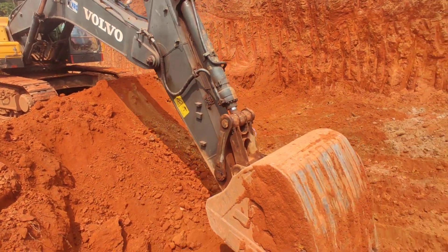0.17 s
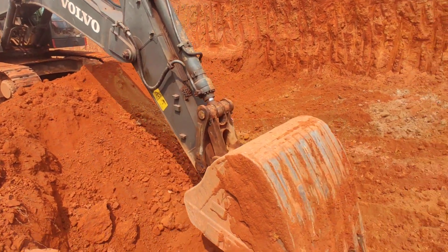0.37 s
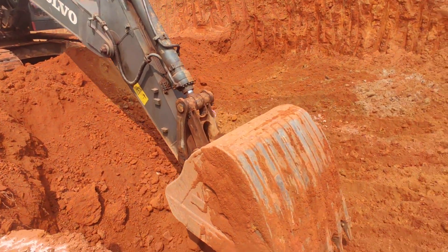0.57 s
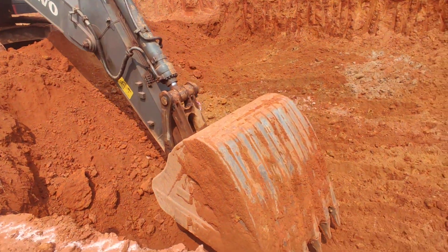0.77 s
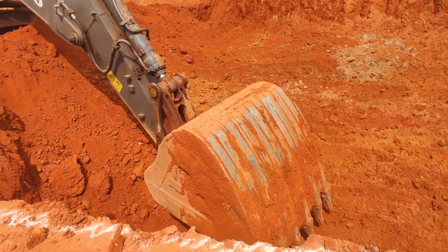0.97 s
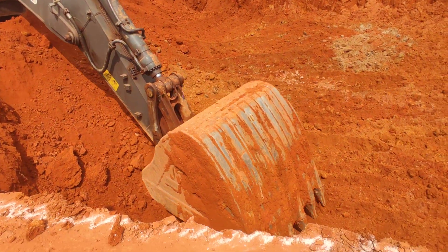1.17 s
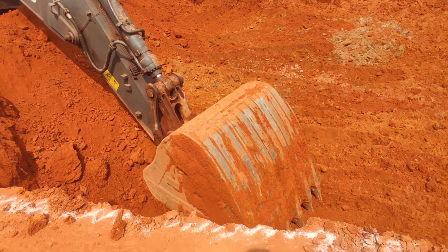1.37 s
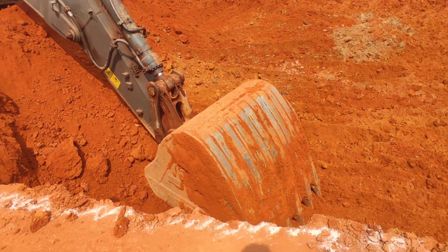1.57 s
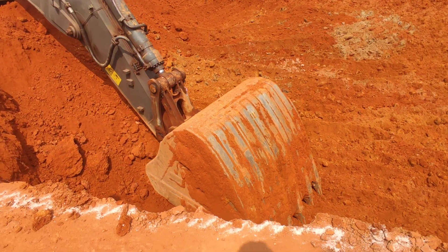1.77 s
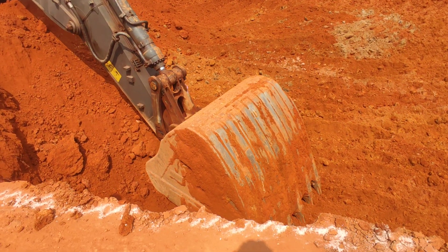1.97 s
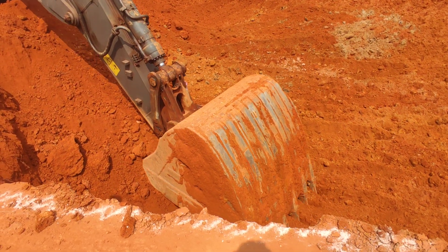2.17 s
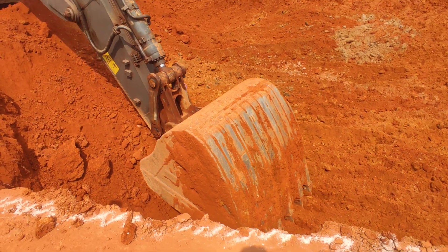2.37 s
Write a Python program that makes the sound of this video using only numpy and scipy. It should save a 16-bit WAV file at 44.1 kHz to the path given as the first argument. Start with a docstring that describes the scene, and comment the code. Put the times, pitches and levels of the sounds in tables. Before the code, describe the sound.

Close stereo phone pickup of an excavator outdoors: rough engine thrum, fan roar and wavering pump hum, with bucket clunks, one creaky steel squeal midway, a crisp knock and a final heavy clanking thud.

```python
"""A diesel excavator works in an earthen pit, weighted to the left over most of the range below the high treble.
Uneven firings thrum in exhaust resonances, the hydraulic pump hums as sines locked to the engine speed, and
fan and oil lines roar and hiss as noise that pulses with the firings. A dry pin squeals once as noise held in
resonances over a low creak; the bucket thuds and its linkage clanks as decaying modes, with echo from the pit walls."""
import sys
import numpy as np
from scipy import signal
from scipy.fft import rfft, irfft, next_fast_len
from scipy.io import wavfile
from scipy.ndimage import uniform_filter1d

SR = 44100
rng = np.random.default_rng(int(sys.argv[2]) if len(sys.argv) > 2 else 0)


def unload_audio(sound):
    """Save the sound as a 16-bit wav file, at the path given as the first command line argument."""
    columns = np.transpose(np.atleast_2d(sound))
    # keep every value between -1 and 1, then stretch to whole-number steps
    steps = np.round(np.clip(columns, -1, 1) * 32767)
    wavfile.write(sys.argv[1], SR, steps.astype(np.int16))


N = 111573
T = np.arange(N) / SR


def undb(db):
    """dB to gain."""
    return 10 ** (np.asarray(db) / 20)


def unit(x):
    """Scale to rms 1."""
    return x / np.sqrt(np.mean(x ** 2))


def curve(table, col):
    """One column of a table, drawn as straight lines through time."""
    table = np.array(table)
    return np.interp(T, table[:, 0], table[:, col])


def at_hz(spec, hz):
    """A spectrum in dB read on a log frequency axis."""
    spec = np.array(spec)
    return np.interp(np.log(hz + 1), np.log(spec[:, 0] + 1), spec[:, 1])


def band(x, hz, width):
    """Resonance with gain 1 at its centre."""
    return signal.lfilter(*signal.iirpeak(hz, hz / width, SR), x)


def double_band(x, hz, width):
    """The same resonance twice in a row, for steeper skirts."""
    return band(band(x, hz, width), hz, width)


def walk(rate):
    """Smooth random wander: random levels held 1 / rate seconds, averaged twice, with gain to make up the loss."""
    k = int(SR / rate)
    steps = np.repeat(rng.standard_normal(N // k + 1), k)
    return 1.238 * uniform_filter1d(uniform_filter1d(steps, k), k)[:N]


def add(out, s, db, x):
    """Mix a sound in at time s with its peak at db."""
    i = int(s * SR)
    out[i:i + len(x)] += (undb(db) * x / abs(x).max())[:N - i]


# Engine drive. Each row: time in seconds, firing rate in Hz, pump hum level in dB, roar level in dB,
# hiss level in dB.
ENGINE_DRIVE = [(0, 87.28, -32.5, -25, -35), (.16, 87.6, -23.5, -26.5, -33),
                (.29, 88.18, -33.5, -27, -35.5), (.45, 86.74, -26, -24.5, -39),
                (.52, 87.76, -27.5, -28, -37), (.95, 89.67, -26, -29, -38.5),
                (1.08, 89.46, -40, -25.5, -38), (1.4, 91.41, -36.5, -28.5, -40.5),
                (1.75, 91.62, -47, -33, -44), (1.95, 91.74, -36, -29.5, -43),
                (2.12, 87.5, -31, -27.5, -41.5), (2.3, 87.5, -31.5, -26, -42),
                (2.53, 89.83, -37, -21, -40.5)]
CYCLE_JITTER = 0.266  # firing cycles


def engine_cycle():
    """Firing phase in cycles, steady and with the timing jitter of combustion."""
    phase = np.cumsum(curve(ENGINE_DRIVE, 1)) / SR
    return phase, phase + CYCLE_JITTER * walk(40)


# Exhaust resonances. Each row: centre in Hz, width of one filter pass in Hz, relative level in dB.
EXHAUST_RESONANCES = [(49.3, 4.7, -8), (92.1, 17, -5.5), (168.3, 39.6, 1), (345.7, 105, -6)]
EXHAUST_DB = -9  # against the roar level
FIRING_SCATTER_DB, ODD_FIRING_DB = 4.5, -4.5


def exhaust(loose):
    """Each firing is one pressure pulse of uneven strength, every second one weaker, that rings the exhaust."""
    at = np.flatnonzero(np.diff(np.floor(loose)) > 0)
    scatter = FIRING_SCATTER_DB * rng.standard_normal(len(at))
    pulses = np.zeros(N)
    pulses[at] = undb(scatter + ODD_FIRING_DB * (np.arange(len(at)) % 2))
    thrum = sum(undb(db) * unit(double_band(pulses, hz, width)) for hz, width, db in EXHAUST_RESONANCES)
    return undb(curve(ENGINE_DRIVE, 3) + EXHAUST_DB) * unit(thrum)


UPPER_HUM_DB, HUM_WAVER_DB, UPPER_WAVER_DB = -44, 1, 4.5
HUM_DRIFT = 0.021  # firing cycles


def pump_hum(phase):
    """Pump tones at 3 and 5 times the firing rate, wavering in level and drifting slightly in phase."""
    hum = np.zeros(N)
    for order, db, waver_db in ((3, curve(ENGINE_DRIVE, 2), HUM_WAVER_DB), (5, UPPER_HUM_DB, UPPER_WAVER_DB)):
        level = np.sqrt(2) * undb(db + waver_db * walk(11.86))  # sqrt(2): levels are rms
        hum += level * np.sin(2 * np.pi * order * (phase + HUM_DRIFT * walk(10)))
    return hum


SWELL_DB, FLICKER_DB = .6, 2  # reached from 400 Hz up, smaller below


def shimmer(spec):
    """Third-octave noise bands that swell together and flicker alone; rows: direct, scattered left, scattered right."""
    f = np.fft.rfftfreq(N, 1 / SR)
    low, high = spec[0][0], spec[-1][0]
    swell = walk(2.83)
    colored = rfft(rng.standard_normal((3, N))) * undb(at_hz(spec, f)) * (f > low) * (f < high)
    place = 3 * np.log2(f + 1)  # third-octave number of each frequency
    out = 0
    for k in np.arange(np.floor(3 * np.log2(low)), 3 * np.log2(high) + 1):
        overlap = np.clip(1 - abs(place - k), 0, 1)
        part = irfft(colored * np.sqrt(overlap), N)
        depth = min(2 ** (k / 3) / 400, 1)
        out = out + part * undb((SWELL_DB * swell + FLICKER_DB * walk(13.91)) * depth)
    return unit(out)


# Color of the fan roar. Each row: frequency in Hz, relative density in dB per Hz.
ROAR_COLOR = [(15, -36), (25, -12), (120, -16.5), (165, -3), (275, -4.5), (313, -7), (449, -7),
              (510, -16.5), (886, -9.5), (2120, -23.5), (4000, -37.5), (5200, -63), (8800, -120)]
# Color of the oil-line hiss. Each row: frequency in Hz, relative density in dB per Hz.
HISS_COLOR = [(1180, -44), (2000, -6), (2460, -11.5), (3700, -3.5), (4630, -10.5), (7860, -2), (8570, -3),
              (9570, -29), (13300, -29.5), (15500, -42)]
FAN_DB = -2.5  # against the roar level
ROAR_GATE_DB, HISS_GATE_DB = 1.5, 1.2  # pulsing up and down with each firing


def fan_and_oil(loose):
    """Turbulent air roars and oil lines hiss, both pulsing with the firing cycle; rows as in shimmer."""
    pulse = np.cos(2 * np.pi * loose)
    roar = undb(curve(ENGINE_DRIVE, 3) + FAN_DB + ROAR_GATE_DB * pulse) * shimmer(ROAR_COLOR)
    hiss = undb(curve(ENGINE_DRIVE, 4) + HISS_GATE_DB * pulse) * shimmer(HISS_COLOR)
    return roar + hiss


# Squeal course. Each row: time in seconds, treble level in dB, low creak level in dB, low creak pitch in Hz.
SQUEAL_COURSE = [(.93, -37.5, -52, 991), (.97, -24, -31, 983), (1.03, -24, -35, 1000),
                 (1.07, -26.5, -34, 1126), (1.2, -31.5, -44, 1013), (1.29, -36.5, -54, 1000),
                 (1.36, -48, -60, 1000)]
# Squeal resonances. Each row: centre in Hz, width of one filter pass in Hz, relative gain in dB.
SQUEAL_RESONANCES = [(2900, 1200, -6.5), (3656, 83, 3.5), (4680, 94, 7), (5300, 400, -6.5),
                     (6090, 240, 4.5), (6920, 55, 8), (7810, 170, 5), (9000, 75, 4), (9500, 200, -10),
                     (12460, 1200, -20.5)]
SQUEAL_WASH_DB, SQUEAL_FLICKER_DB, CREAK_WIDTH_HZ = -5, 3.5, 55


def squeal():
    """Dry steel rubbing: friction noise held in flickering resonances, over a low creak; rows as in shimmer."""
    start, end = SQUEAL_COURSE[0][0], SQUEAL_COURSE[-1][0]
    on = np.clip(np.minimum(T - start, end - T) / 0.0097, 0, 1)  # 9.7 ms fades

    def noise():
        """Three rows of white noise."""
        return rng.standard_normal((3, N))

    rings = sum(undb(db + SQUEAL_FLICKER_DB * walk(30.07)) * double_band(noise(), hz, width)
                for hz, width, db in SQUEAL_RESONANCES)
    wash = band(band(noise(), 5800, 3400), 5870, 2900)
    treble = unit(unit(rings) + undb(SQUEAL_WASH_DB) * unit(wash))
    # slow noise on a cosine and a sine makes a narrow band that follows the creak pitch
    slow = signal.lfilter([1], [1, -np.exp(-np.pi * CREAK_WIDTH_HZ / SR)], [noise(), noise()])
    turn = 2 * np.pi * np.cumsum(curve(SQUEAL_COURSE, 3)) / SR
    creak = unit(slow[0] * np.cos(turn) + slow[1] * np.sin(turn))
    return on * (undb(curve(SQUEAL_COURSE, 1)) * treble + undb(curve(SQUEAL_COURSE, 2)) * creak)


# Bucket thuds. Each row: start in seconds, dry peak level in dB, pitch in Hz.
BUCKET_THUDS = [(0.354, -16, 189), (0.368, -15.5, 221.6), (0.404, -14.5, 277.3), (0.419, -12.5, 253.6),
                (0.44, -34, 263), (1.174, -14.5, 177), (1.402, -15.5, 190.7), (1.445, -21.5, 125),
                (1.579, -19, 180), (1.629, -22, 201), (2.411, -5, 162.5), (2.519, -17, 214)]
# Thud overtones. Each row: ratio to the pitch, relative level in dB.
THUD_OVERTONES = [(1, 4.5), (1.45, -4), (1.95, -3.5), (0.535, -11.5)]
THUD_PUSH_S, THUD_T60_S = 0.0039, .13  # onset time constant, decay by 60 dB at ratio 1


def bucket_thuds():
    """Soft pushes sound the low bucket modes; the higher ones die sooner."""
    out, t = np.zeros(N), T[:SR // 4]
    for s, db, pitch in BUCKET_THUDS:
        ring = sum(undb(g) * np.sin(2 * np.pi * pitch * r * t) * 1000. ** (-t * r ** 0.53 / THUD_T60_S)
                   for r, g in THUD_OVERTONES)
        add(out, s, db, ring * (1 - np.exp(-t / THUD_PUSH_S)))
    return out


# Linkage clanks. Each row: start in seconds, dry peak level in dB, 60 dB decay in seconds,
# strongest region in Hz.
LINKAGE_CLANKS = [(.343, -14, 0.15, 670), (.389, -20, .14, 892), (1.174, -19.5, 0.081, 765),
                  (1.383, -6.5, 0.042, 1020), (1.384, -17.5, 0.034, 2470), (1.388, -16.5, 0.023, 7400),
                  (1.417, -25.5, 0.033, 1190), (1.999, -26.5, 0.18, 6800), (2.319, -21.5, 0.17, 780),
                  (2.384, -13.5, 0.29, 616.4), (2.397, -24, 0.088, 1580), (2.474, -11.5, 0.14, 780),
                  (2.487, -20, .05, 1700)]
# Linkage modes. Each row: nominal frequency in Hz, relative level in dB before the tilt and scatter of each hit.
LINKAGE_MODES = [(600, -1), (700, -2), (830, -1), (980, -0.5), (1600, -1.5), (2400, -14), (3300, 0),
                 (4700, -18), (6200, 15), (7800, 13)]
CLANK_SLOPE_DB = 10  # fall per octave away from the strongest region
MODE_SCATTER_DB, MODE_DETUNE, RATTLE_DB = 3.5, 0.02, -3.5


def linkage_clanks():
    """Sharp hits ring the linkage modes, each hit scattering their level and pitch, with a burst of rattle noise."""
    out, t = np.zeros(N), T[:SR // 4]
    f = np.fft.rfftfreq(len(t), 1 / SR)
    edges = (f > 480) / (1 + (f / 9500) ** 6)
    for s, db, t60, centre_hz in LINKAGE_CLANKS:
        ring = np.zeros(len(t))
        for hz, g in LINKAGE_MODES:
            scatter, detune = rng.standard_normal(2)
            level = g - CLANK_SLOPE_DB * abs(np.log2(hz / centre_hz)) + MODE_SCATTER_DB * scatter
            ring += undb(level) * np.sin(2 * np.pi * hz * (1 + MODE_DETUNE * detune) * t)
        tilt = undb(-CLANK_SLOPE_DB * abs(np.log2((f + 1) / centre_hz)))
        rattle = irfft(rfft(rng.standard_normal(len(t))) * tilt * edges, len(t))
        envelope = 1000. ** (-t / t60) * (1 - np.exp(-t / 0.0013))
        add(out, s, db, (unit(ring) + undb(RATTLE_DB) * unit(rattle)) * envelope)
    return out


PIT_T60_S = 0.19
HARD_ECHO_DB = -7  # echo of tones and hits, on top of the pit color


def pit_echo(n):
    """Spectra of two separate decaying noise tails, the short echo of the pit walls at left and right."""
    tail = rng.standard_normal((2, SR // 4)) * 1000. ** (-T[:SR // 4] / PIT_T60_S)
    tail = tail / np.sqrt(np.sum(tail ** 2, axis=1, keepdims=True))
    return rfft(tail, n) * undb(HARD_ECHO_DB)


# Stereo balance. Each row: frequency in Hz, left minus right in dB.
STEREO_BALANCE = [(60, 5.5), (110, 3.5), (200, 3), (380, 7), (700, 1), (1290, 4), (2380, -0.5), (4400, 2),
                  (8120, -3.5), (15000, -4.5)]
# Pit color. Each row: frequency in Hz, reflected against direct sound in dB (before HARD_ECHO_DB for tones and hits).
PIT_COLOR = [(30, -12), (250, -16), (600, -5), (1200, 0), (4000, .5)]
LEFT_LAG_S = 17.5 / 44100


def scene():
    """Direct sound reaches the left port late; the pit walls give each port its own short echo and scattered noise."""
    n = next_fast_len(N + SR // 2)
    f = np.fft.rfftfreq(n, 1 / SR)
    phase, loose = engine_cycle()
    hard = rfft(exhaust(loose) + pump_hum(phase) + bucket_thuds() + linkage_clanks(), n)
    soft = rfft(fan_and_oil(loose) + squeal(), n)
    direct = np.array([np.exp(-2j * np.pi * f * LEFT_LAG_S), np.ones(len(f))])
    pit = undb(at_hz(PIT_COLOR, f))
    hard_heard = hard * (direct + pit * pit_echo(n))
    soft_heard = (soft[0] * direct + pit * soft[1:]) / np.sqrt(1 + pit ** 2)  # mix keeps the noise power
    pan = undb(at_hz(STEREO_BALANCE, f) * np.array([[.5], [-.5]]))
    return irfft((hard_heard + soft_heard) * pan, n)[:, :N]


TOP_HZ = 15400


def record(dry):
    """The phone cuts the top with a steep low-pass."""
    return signal.sosfilt(signal.ellip(8, .2, 70, TOP_HZ, fs=SR, output="sos"), dry)


dry = scene()
out = record(dry)
unload_audio(out)
```